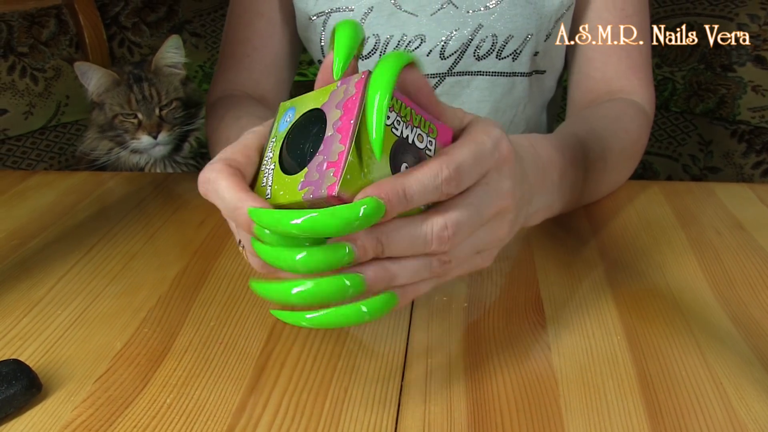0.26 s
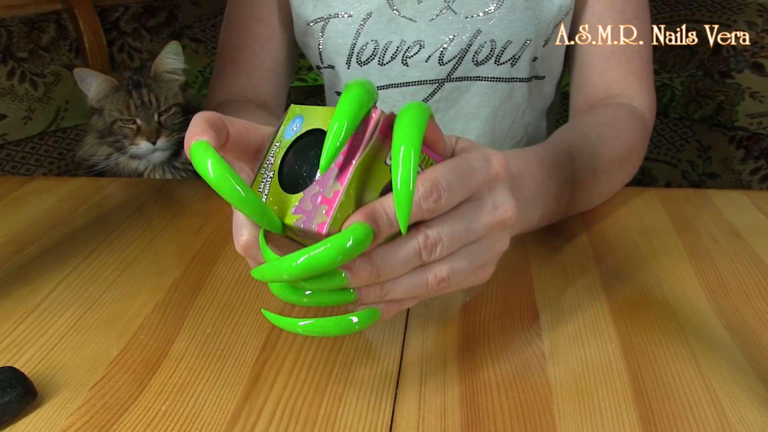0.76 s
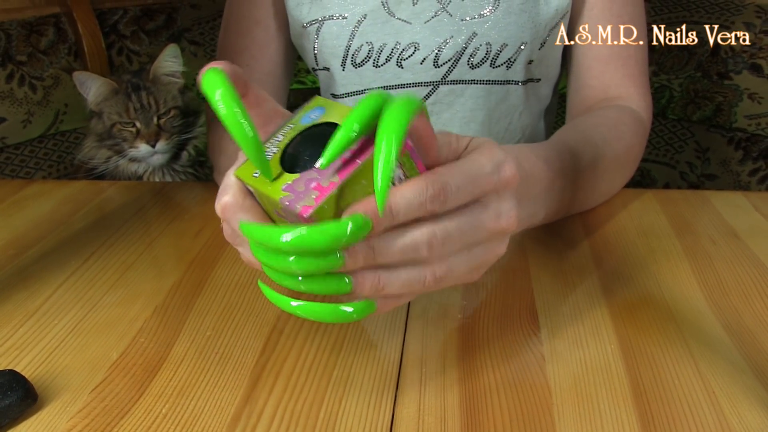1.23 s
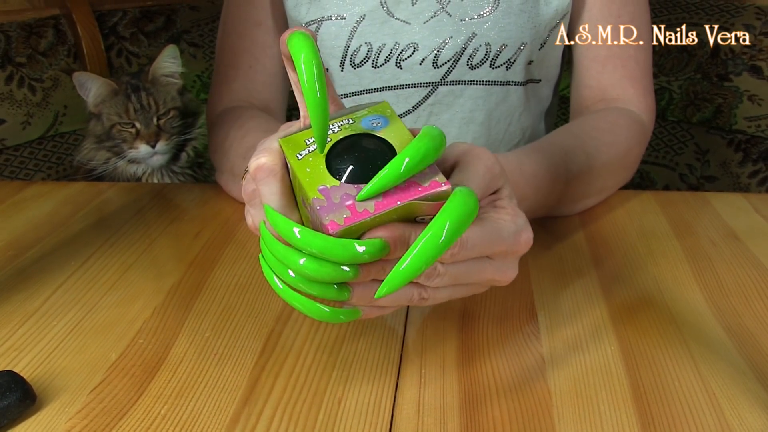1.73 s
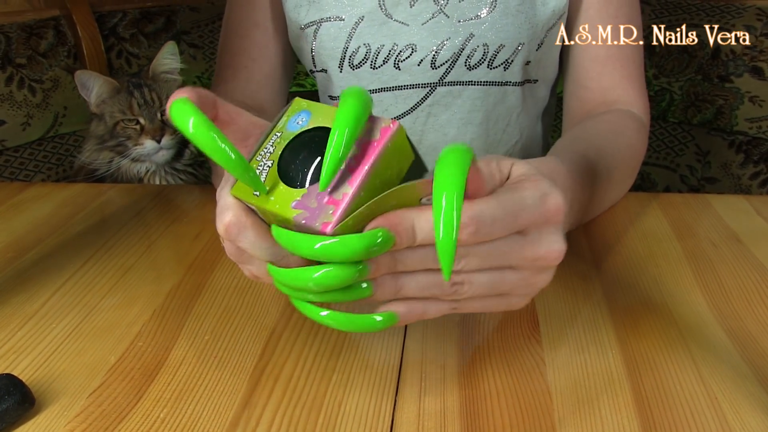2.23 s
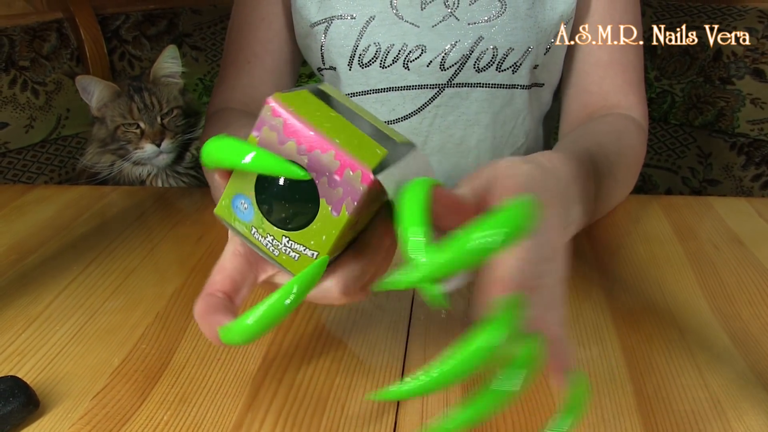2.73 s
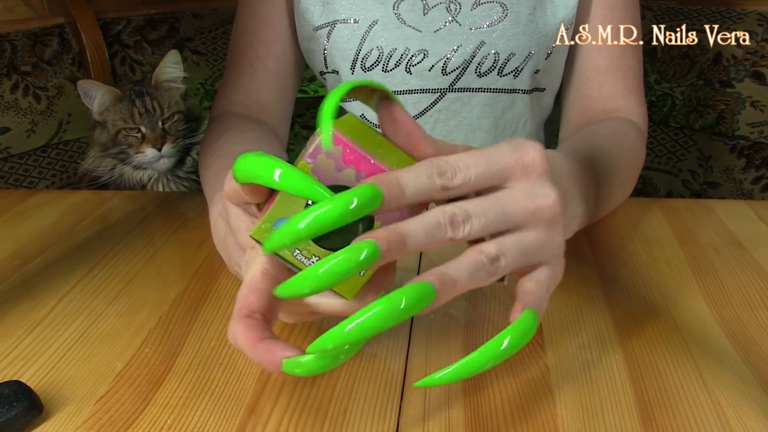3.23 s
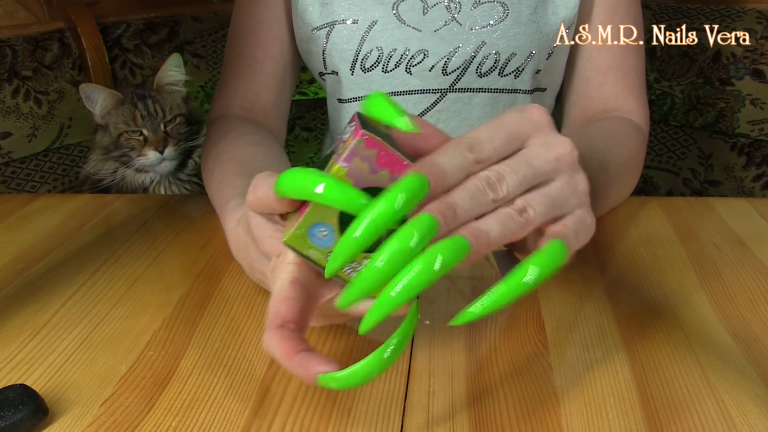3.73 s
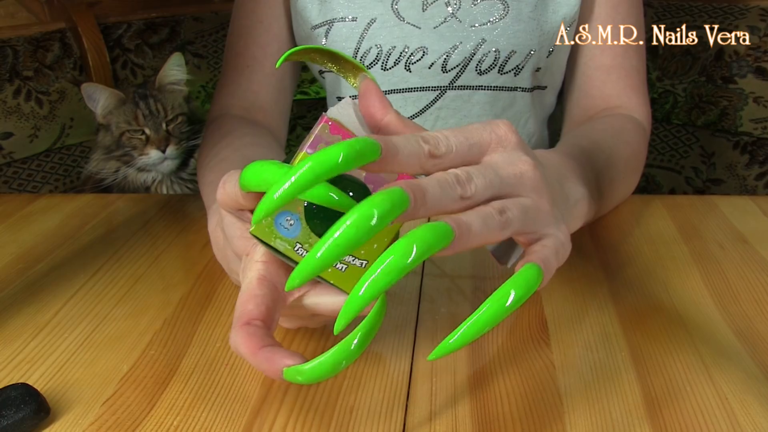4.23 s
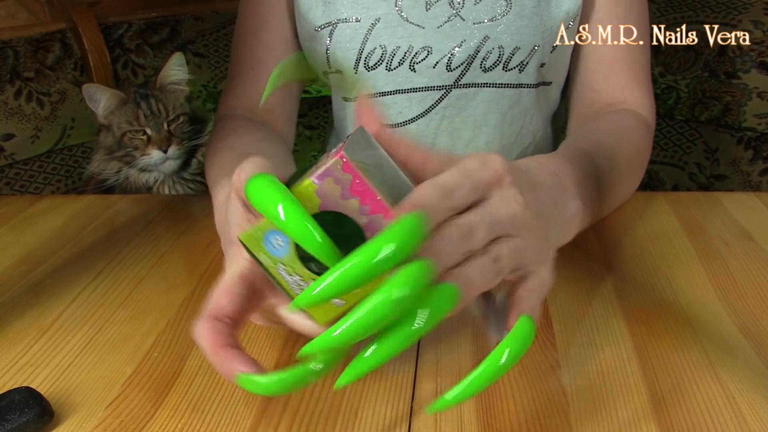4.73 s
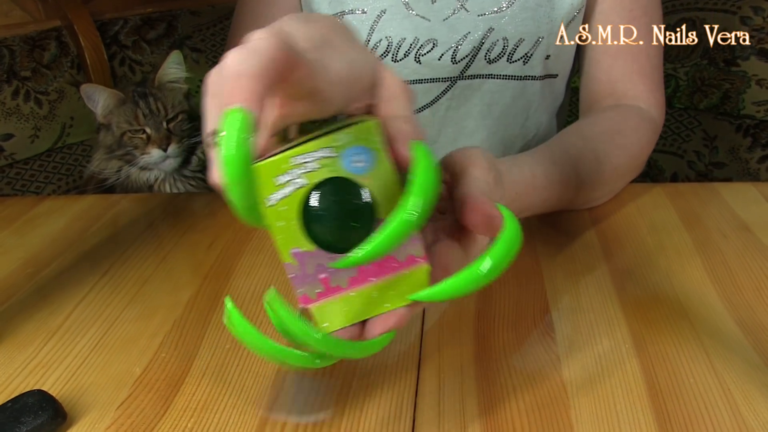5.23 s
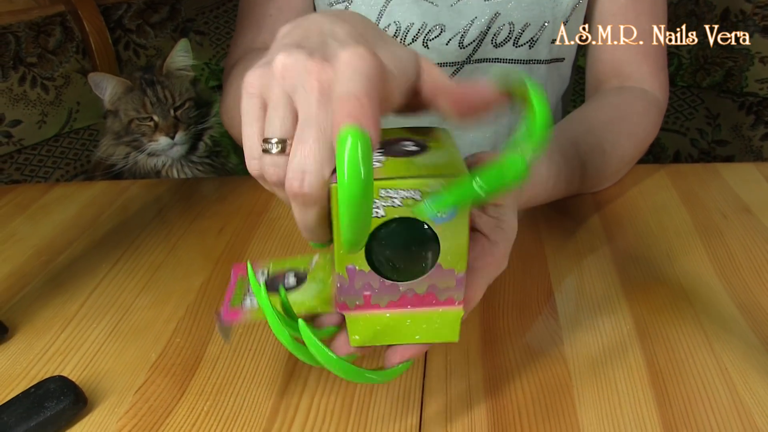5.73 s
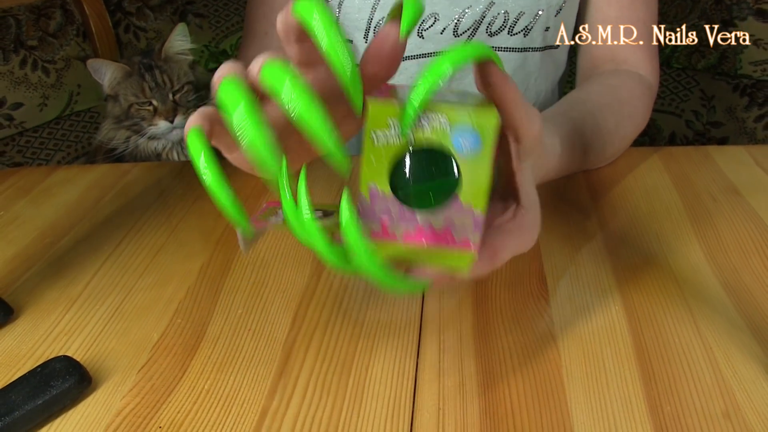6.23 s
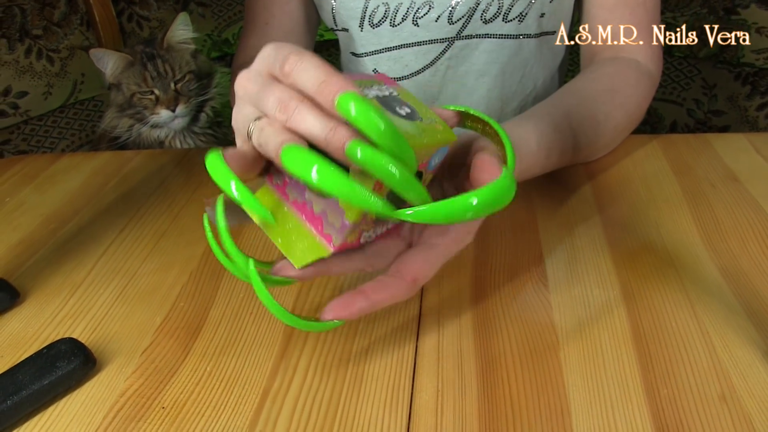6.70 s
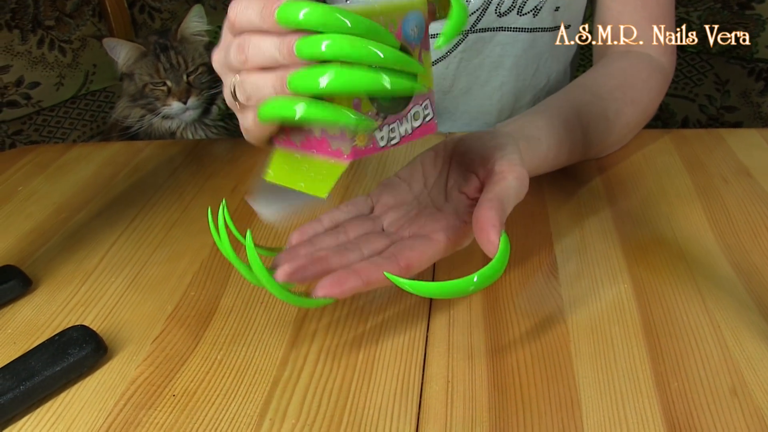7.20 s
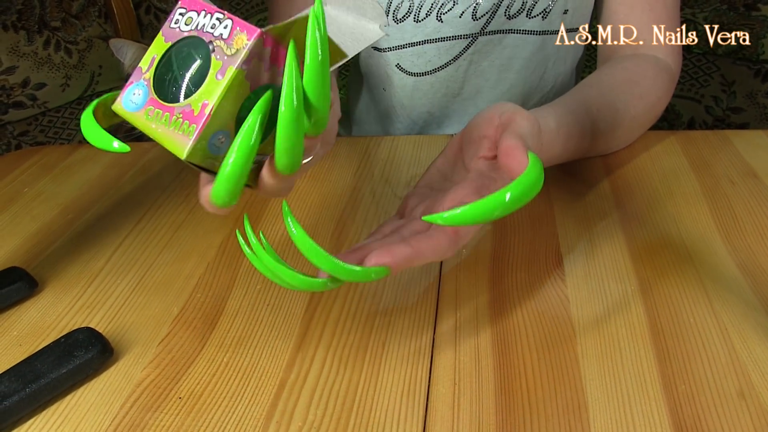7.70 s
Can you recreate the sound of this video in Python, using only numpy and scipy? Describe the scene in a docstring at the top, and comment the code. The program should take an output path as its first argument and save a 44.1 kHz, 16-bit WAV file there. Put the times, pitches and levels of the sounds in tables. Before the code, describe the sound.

Long hard fingernails click, scrape and skid over a small hollow cardboard box, with sharp snaps, soft bumps and faint rustling close up.

```python
"""Long hard fingernails click, slip and drag on a small glossy cardboard box held over a wooden table.
Clicks, skids, ticks and drags are noise and pulses; most of them ring the hollow box in a few broad modes.
The box bumps softly on palm or fingers, and a small furnished room answers with a diffuse tail.
Two spaced microphones on the table also pick up its slow shaking, their own hiss and quiet air."""
import sys
import numpy as np
from scipy import signal
from scipy.io import wavfile
from scipy.ndimage import map_coordinates

SR = 44100
rng = np.random.default_rng(int(sys.argv[2]) if len(sys.argv) > 2 else 0)


def transcribe(signal):
    """Save signal, clipped to [-1, 1], as a 16-bit WAV file at the path in sys.argv[1]."""
    frames = np.atleast_2d(signal).T
    limited = np.clip(frames, -1, 1)
    pcm = np.round(limited * 32767).astype(np.int16)
    wavfile.write(sys.argv[1], SR, pcm)


N = 351114

# Modes of the box. Each row: frequency in Hz, width in Hz, relative level in dB.
BOX_MODES = [(654, 400, -3), (1018.5, 235, 6.5), (1258, 270, -0.16), (1740.5, 428, -1.5), (2213, 606, 0.5),
             (3222, 780, -3), (5120, 630, -3.5), (6900, 500, -1.5)]
# Restless grip on the card. Each row: time in seconds, level in dB.
GRIP = [(.95, -57), (1.3, -52.5), (1.75, -58), (2.3, -55.5), (2.65, -57.5), (3.3, -44.5), (4.95, -54.5),
        (5.25, -47.5), (5.48, -55.5), (5.8, -40.5), (6.08, -55.5), (6.5, -47.5), (7.1, -51), (7.63, -52),
        (7.78, -65.5)]


def from_db(db):
    """Amplitude ratio of a level: 20 dB for each factor of ten."""
    return 10 ** (np.asarray(db) / 20)


def rms_one(x):
    """Division by the root mean square gives unit power."""
    return x / np.sqrt(np.mean(x ** 2) + 1e-20)


def in_time(rows):
    """Linear interpolation turns timed rows into one continuous course per column."""
    s, *columns = np.transpose(rows)
    return [np.interp(np.arange(N) / SR, s, column) for column in columns]


def flicker(rate):
    """Slow random modulation: straight lines between normal draws, rate draws a second."""
    knots = rng.standard_normal(4000)
    return np.interp(np.arange(N) / SR * rate, np.arange(4000), knots)


def band(x, low_hz, high_hz):
    """Band-pass filtering limits a sound to one range of the spectrum."""
    return signal.sosfilt(signal.butter(2, [low_hz, high_hz], "band", fs=SR, output="sos"), x)


def resonate(x, hz, width_hz):
    """Damped resonance as a pole pair: gain 1 at its peak, zeros at both ends of the spectrum."""
    radius = np.exp(-np.pi * width_hz / SR)
    angle = 2 * np.pi * hz / SR
    zeros = [(1 - radius * radius) / 2, 0, (radius * radius - 1) / 2]
    poles = [1, -2 * radius * np.cos(angle), radius * radius]
    return signal.lfilter(zeros, poles, x + 1e-18)


def mode(x, hz, width_hz):
    """Cascaded resonance: two equal broad stages give steep skirts and dark valleys between modes."""
    wide_hz = 1.5 * width_hz
    return resonate(resonate(x, hz, wide_hz), hz, wide_hz)


def favour(pitch_hz, focus_db):
    """Selective excitation: a box mode loses level with its distance in octaves from the contact's pitch."""
    octaves = np.abs(np.log2(np.array(BOX_MODES)[:, 0] / pitch_hz))
    return -focus_db * np.minimum(octaves, 1.5) ** .7


def pressure(swell=0.17, focus_db=6.0):
    """Contact force sets amplitude: a wavering grip plus swelling strokes drive each mode and the hiss."""
    # Single strokes of nail or skin across the card.
    # Each row: start in seconds, length in seconds, level in dB, favoured pitch in Hz.
    strokes = [(0.0, 0.083, -43.5, 1900), (0.682, 0.076, -41, 2090), (1.05, 0.052, -34.5, 1300),
               (1.2, 0.048, -47, 2500), (1.989, 0.16, -32.5, 1800), (2.18, 0.11, -30, 1900),
               (2.391, 0.073, -37, 2100), (3.1, 0.047, -37.5, 1100), (3.332, 0.021, -33, 1100),
               (3.364, 0.031, -48.5, 1250), (3.487, 0.17, -61.5, 1050), (3.621, 0.036, -38.5, 2300),
               (3.738, 0.078, -44, 3250), (4.033, 0.083, -45.5, 3000), (4.355, 0.046, -50, 2700),
               (4.466, 0.06, -48.5, 2700), (4.6, 0.1, -43, 2300), (4.699, 0.15, -42.5, 2140),
               (5.372, 0.029, -40, 2000), (5.574, 0.083, -42, 1000), (6.152, 0.047, -36, 1500),
               (6.285, 0.11, -28, 2300), (6.805, 0.046, -36, 1500), (6.98, 0.017, -46.5, 1250),
               (7.506, 0.068, -37, 1900)]
    waver_db, wavers_per_s = 2.5, 22   # random wavering of the grip level
    grip_hiss_db, stroke_hiss_db = -7, -5.5   # surface hiss against the ringing of the box
    t = np.arange(N) / SR
    grip = from_db(in_time(GRIP)[0] + waver_db * flicker(wavers_per_s))
    body = np.tile(grip, (len(BOX_MODES), 1))
    hiss = from_db(grip_hiss_db) * grip
    power = np.array(BOX_MODES)[:, 1] * from_db(2 * np.array(BOX_MODES)[:, 2])
    for s, length_s, level_db, pitch_hz in strokes:
        near = slice(max(round((s - .05) * SR), 0), round((s + length_s + .05) * SR))
        to_edge = np.minimum(t[near] - s, s + length_s - t[near])
        stroke = from_db(level_db) * np.clip(to_edge / (swell * length_s) + .5, 0, 1) ** 2
        share = from_db(favour(pitch_hz, focus_db))
        even = np.sqrt(power.sum() / (power * share ** 2).sum())   # favouring keeps the total power
        body[:, near] += stroke * share[:, None] * even
        hiss[near] += from_db(stroke_hiss_db) * stroke * pitch_hz / 2000   # higher strokes hiss more
    return body, hiss


def drag(grains_per_s=900, rough_db=5.5):
    """Stick-slip friction: fibres release dense uneven grains that ring the box while the surface hisses."""
    wide_db = -1   # hiss that differs between the sides, against the common hiss
    body_gain, hiss_gain = pressure()
    sizes = from_db(rough_db * np.minimum(rng.exponential(1, N), 4)) * rng.choice([-1, 1], N)
    slips = rms_one(sizes * (rng.random(N) < grains_per_s / SR))
    grains = (slips + .6 * rng.standard_normal(N)) * from_db(3.8 * flicker(55))
    rings = []
    for k, (hz, width_hz, level_db) in enumerate(BOX_MODES):
        gain = (-1) ** k * from_db(level_db + 3 * flicker(12))   # neighbouring modes in opposite sign
        rings.append(gain * mode(grains, hz, width_hz))
    rings = np.array(rings)
    rung = np.sum(body_gain * rings, axis=0) / np.std(rings.sum(axis=0))
    hiss = hiss_gain * rms_one(band(grains, 3500, 13000))
    # the rubbed face is wide: this part has opposite sign left and right
    wide = rms_one(band(grains * rng.choice([-1, 1], N), 2000, 15500))
    return rung + hiss, from_db(wide_db) * hiss_gain * wide * [[1], [-1]]


def ticks():
    """Clustered random impulses: nail tips touch each other and the gloss in thin bright clumped ticks."""
    ticks_per_s, tick_db, spread_db = 55, -31, 5   # rate before clumping, pulse level before the filter
    t = np.arange(N) / SR
    chance = ticks_per_s * from_db(6 * flicker(4)) / SR
    born = (rng.random(N) < chance) * (t < GRIP[-1][0])   # none once the hands rest
    sizes = from_db(tick_db + spread_db * rng.standard_normal(N)) * rng.choice([-1, 1], N)
    return band(born * sizes + 1e-18, 900, 7000)


def table():
    """Randomly driven resonance: elbows and hands swing the table's low modes in fits, unalike per side."""
    # Modes of the table. Each row: frequency in Hz, width in Hz before sharpening, relative level in dB.
    table_modes = [(8.45, 10.4, 13), (17.5, 7.2, 1), (43.3, 122, -15), (62, 11, -15), (118, 290, -16.5)]
    # Shaking of the table. Each row: time in seconds, level in dB.
    shaking = [(0, -28), (.6, -27.5), (4.0, -35), (5.0, -31.5), (5.9, -28), (6.6, -26), (7.96, -40)]
    total, fits = 0, flicker(6.4)
    for hz, width_hz, level_db in table_modes:
        push = rng.standard_normal((2, N + SR))
        swing = resonate(mode(push, hz, width_hz), hz, width_hz)[:, SR:]   # skip the build-up
        total = total + from_db(level_db + 3 * flicker(6.4) + 4.5 * fits) * rms_one(swing)
    return from_db(in_time(shaking)[0]) * rms_one(total)


def noise_floor():
    """Stationary noise, independent per channel: microphone hiss and the quiet air of the room."""
    hiss_db, air_db = -74, -76
    hiss = rms_one(band(rng.standard_normal((2, N)), 330, 16000))
    air = rms_one(band(rng.standard_normal((2, N)), 210, 2300))
    return from_db(hiss_db) * hiss + from_db(air_db) * air


def contacts(rows, length_s, focus_db, fade_s, snap):
    """Forced modal ringing: contact bends the card, tuning its modes to the pitch; the nail cracks and rebounds."""
    spread_db = 2   # chance in how hard each mode is struck
    span = 2600   # samples given to each contact
    t, out = np.arange(span) / SR, np.zeros(N + span)
    for s, peak_db, pitch_hz, crack_db in rows:
        push, scratch = rng.standard_normal((2, span))
        touch = np.minimum(t / .001, 1) * np.exp(-np.maximum(t - length_s, 0) / fade_s)
        again = int(rng.uniform(.003, .012) * SR)   # delay of the first of two rebounds
        touch = touch + .13 * np.roll(touch, again) + .08 * np.roll(touch, 3 * again)
        force = push * touch + snap * (np.arange(span) == 30)   # one clean snap within the rough contact
        favour_db = favour(pitch_hz, focus_db)
        bend = pitch_hz / BOX_MODES[np.argmax(favour_db)][0]   # nearest mode lands on the pitch
        body = 0
        for (hz, width_hz, level_db), mode_db in zip(BOX_MODES, favour_db):
            gain = from_db(level_db + mode_db + spread_db * rng.standard_normal())
            body = body + gain * mode(force, bend * hz, width_hz)
        crack = band(scratch * touch, 1800, 11000)
        both = body / np.max(np.abs(body)) + from_db(crack_db) * crack / np.max(np.abs(crack))
        at = round(s * SR)
        out[at:at + span] += from_db(peak_db) * both / np.max(np.abs(both))
    return out[:N]


def skids():
    """Sustained rough excitation: a nail skids over an edge and drives the box for some milliseconds."""
    # Each row: start in seconds, peak level at the box in dB, favoured pitch in Hz, crack against body in dB.
    skid_rows = [(0.052, -19, 980, -37), (0.591, -14, 1240, -0.5), (1.023, -15.5, 1130, -3.5),
                 (1.216, -24.5, 1200, -4), (2.1, -8, 2050, -12.5), (2.734, -19, 1143, 0.5),
                 (6.203, -7.5, 1000, -3.5), (6.335, -0.5, 3150, -23), (6.345, -12.5, 1470, -1),
                 (6.355, -5, 1962, -11), (7.047, -25, 1440, -8), (7.553, -19.5, 2150, -22)]
    return contacts(skid_rows, length_s=0.0046, focus_db=7.0, fade_s=0.0059, snap=0)


def clicks():
    """Impulsive excitation: nail clicks and flap snaps fade at once and leave the box ringing."""
    # Each row: start in seconds, peak level at the box in dB, favoured pitch in Hz, crack against body in dB.
    click_rows = [(0.124, -21, 920, 11), (0.162, -13.5, 1694, -13), (0.336, -20, 1000, -8),
                  (0.36, -21, 680, -3), (0.429, -18.5, 1949, 1.5), (0.624, -2, 4590, -12),
                  (0.697, -0.5, 2080, -26), (1.081, -16, 1190, -4.5), (1.273, -20, 1360, -3.5),
                  (1.304, -23, 1230, -27), (1.458, -6.5, 2250, -8), (1.476, -13.5, 1276, -14),
                  (1.67, -28.5, 2100, -7), (1.912, -35.5, 4260, -7), (2.118, -17, 2160, -17.5),
                  (2.22, 6, 1770, -7), (2.231, 6, 2000, -1.5), (2.397, -17.5, 1180, -3),
                  (2.455, 3.5, 1850, -2.5), (2.827, -14.5, 1082, -52), (3.189, -10.5, 1730, -40),
                  (3.556, -21, 4400, 11), (3.923, -21.5, 1972, -26), (3.952, -18, 2960, -14),
                  (4.087, -8, 605, -4), (4.692, -42, 5240, -3), (4.828, -24, 2100, -5),
                  (5.038, -4.5, 900, -29), (5.049, -3, 970, -15), (5.296, -26.5, 1405, -7.5),
                  (5.506, -28, 2860, -5), (5.568, -8, 7450, 2), (5.634, -26.5, 1140, -11),
                  (5.7, -21, 2520, -10), (5.745, -27.5, 1670, -3), (5.779, -38, 1500, 3),
                  (5.832, -27, 1080, -20), (6.086, -25, 6420, 2), (6.127, -2, 4530, 0.5),
                  (6.331, -1.5, 1640, -25), (6.637, -24.5, 1450, -6), (6.712, -21.5, 1940, 17),
                  (6.759, -20, 1660, -8), (6.796, -20.5, 1310, 12), (7.027, -23.5, 1320, 3),
                  (7.132, -20.5, 1965, -29), (7.147, -12.5, 1620, -15), (7.215, -19, 1067, -8),
                  (7.286, -19.5, 1220, -21), (7.314, -24, 1080, -26), (7.356, -21.5, 1060, -11),
                  (7.424, -21.5, 1230, -12)]
    return contacts(click_rows, length_s=0, focus_db=12.5, fade_s=0.003, snap=7.2)


def bumps(cycles=5):
    """Heavily damped low resonance: the box bumps on palm or fingers, a noise puff unalike on the two sides."""
    # Each row: start in seconds, peak level in dB, pitch in Hz.
    bump_rows = [(0.622, -22, 330), (2.225, -30, 73.4), (2.738, -33.5, 123), (3.478, -28, 274),
                 (4.085, -20, 364), (5.039, -26, 62), (5.054, -26.5, 194), (6.204, -27.5, 147)]
    span = 8000
    t, out = np.arange(span) / SR, np.zeros((2, N + span))
    for s, peak_db, hz in bump_rows:
        puff = rng.standard_normal((2, span)) * from_db(-60 * t * hz / cycles)   # 60 dB down after the cycles
        thud = resonate(resonate(puff, hz, hz), hz, hz)
        at = round(s * SR)
        out[:, at:at + span] += from_db(peak_db) * thud / np.max(np.abs(thud))
    return out[:, :N]


def microphones(x):
    """Level and arrival differences place the hands; one table-top bounce per side adds comb filtering."""
    # Where the hands are. Each row: time in seconds, left against right in dB, lag of the left in samples
    # (both differences shrink to 0.86 of this at the microphones).
    places = [(0, -2.5, 5), (2.2, 0.5, -1), (3.5, -1.6, -4), (4.7, -0.5, -6), (5.7, -2.5, -5.5),
              (6.9, -0.5, -2), (7.96, -3, 12.5)]
    pan_db, lag = in_time(places)
    # small random wavering of arrival difference and balance between the sides
    lag = lag + 1.3 * flicker(3)
    pan_db = pan_db + 1.5 * flicker(5)
    n, out = np.arange(N), []
    # left then right: signed share of the differences, bounce delay in seconds, bounce gain
    for side, bounce_s, bounce in ((0.85, 0.000478, 0.16), (-0.87, 0.0005984, 0.95)):
        direct = map_coordinates(x, [n - side * lag / 2], order=3, mode="nearest")
        delay = bounce_s * SR * (1 + 0.15 * flicker(1.7))   # wavers at random about the mean
        late = band(np.interp(n - delay, n, direct), 130, 5700)
        out.append(from_db(side * pan_db / 2) * (direct + bounce * late) / np.hypot(1, bounce))
    return np.array(out)


def room(x, delay_s=0.0053):
    """Diffuse reverberation: noise decays exponentially band by band, unrelated in the two channels."""
    # Decay of the room. Each row: frequency in Hz, time to fall 60 dB in seconds.
    decay = np.array([(250, 0.49), (1200, 0.23), (4000, 0.37), (10000, 0.089)])
    t = np.arange(SR // 2) / SR
    edges = 100 * 2.0 ** np.arange(8)   # octave bands
    tail = 0
    for low, high in zip(edges[:-1], edges[1:]):
        t60 = np.interp(np.log(np.sqrt(low * high)), np.log(decay[:, 0]), decay[:, 1])
        tail = tail + band(rng.standard_normal((2, len(t))), low, high) * from_db(-60 * t / t60)
    tail = tail * np.clip(t / delay_s - 1, 0, 1)   # silent for one delay, full after two
    tail = tail / np.sqrt(np.sum(tail ** 2) / 2)
    return signal.fftconvolve(x[None], tail, axes=1)[:, :N]


def scene():
    """Superposition: direct box sound, its room tail, bumps, table and noise add at the microphones."""
    room_db = -14.5
    rubbed, wide = drag()
    box = rubbed + ticks() + skids() + clicks()
    heard = microphones(box) + wide + from_db(room_db) * room(box)
    return heard + bumps() + table() + noise_floor()


def record(dry):
    """Clipping and band limiting: peaks are cut off at 0.95, then a steep low-pass removes the top."""
    low_pass = signal.cheby2(14, 60, 16300, fs=SR, output="sos")   # 60 dB down from 16300 Hz
    return signal.sosfilt(low_pass, np.clip(dry, -.95, .95))


dry = scene()
out = record(dry)
transcribe(out)
```